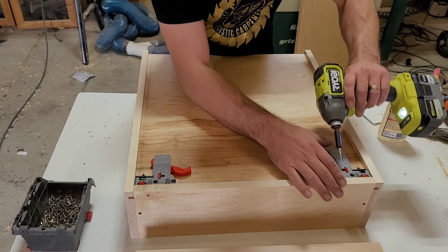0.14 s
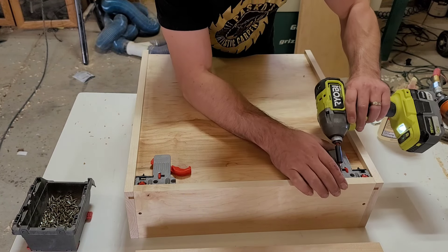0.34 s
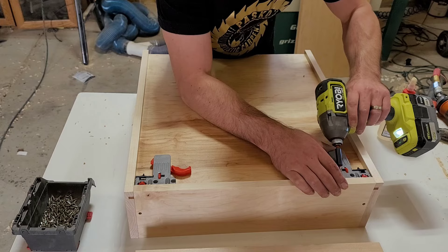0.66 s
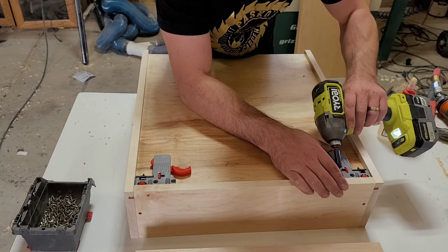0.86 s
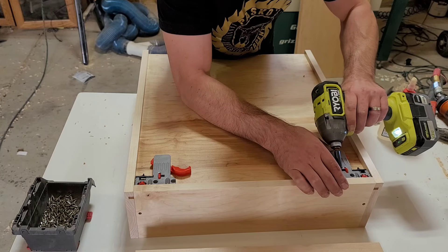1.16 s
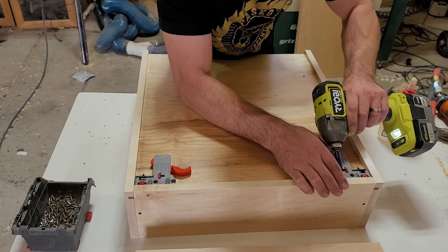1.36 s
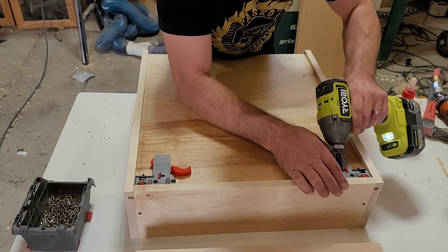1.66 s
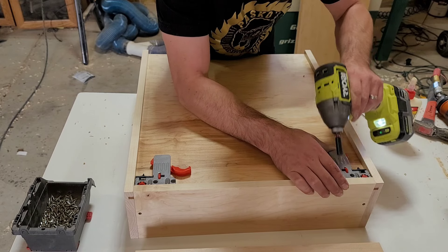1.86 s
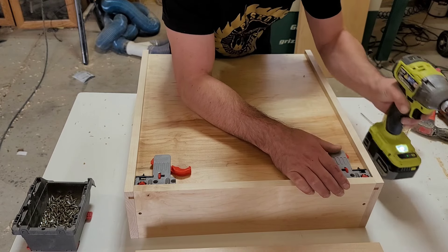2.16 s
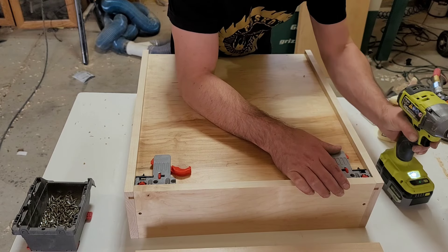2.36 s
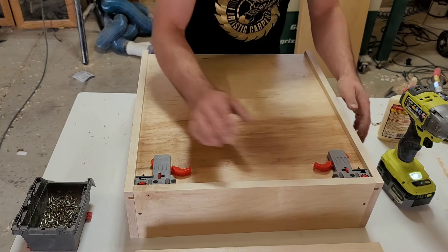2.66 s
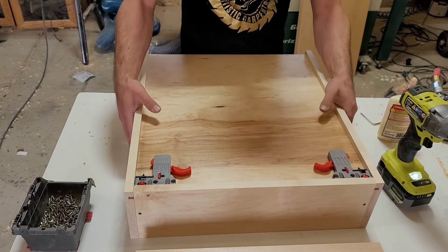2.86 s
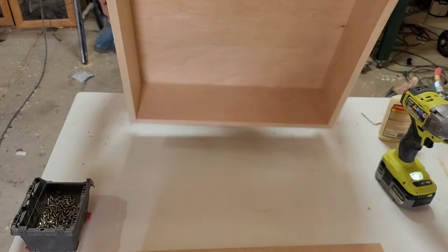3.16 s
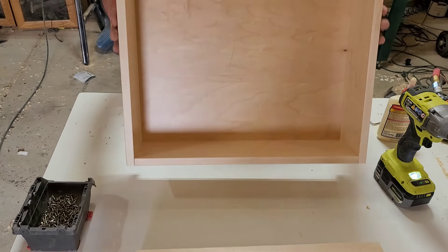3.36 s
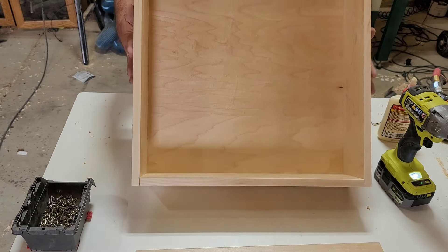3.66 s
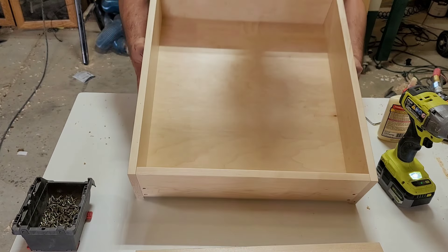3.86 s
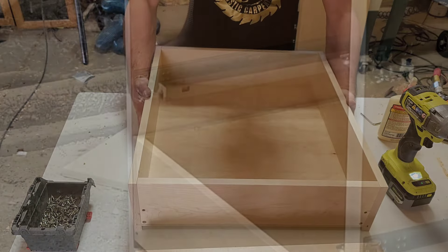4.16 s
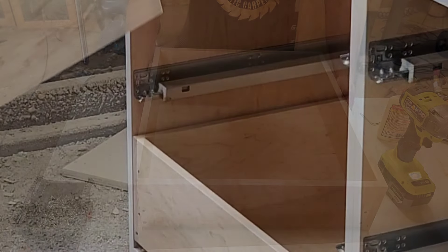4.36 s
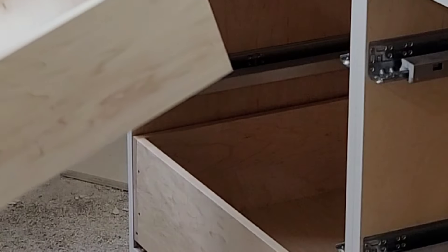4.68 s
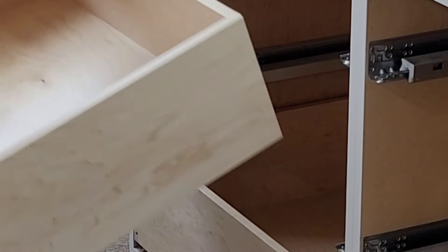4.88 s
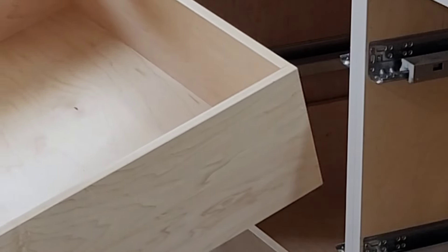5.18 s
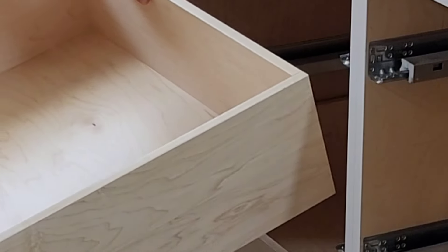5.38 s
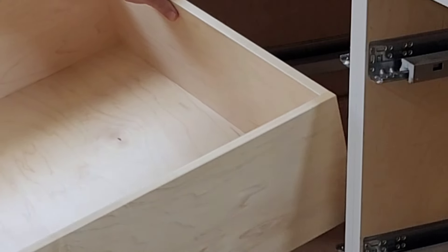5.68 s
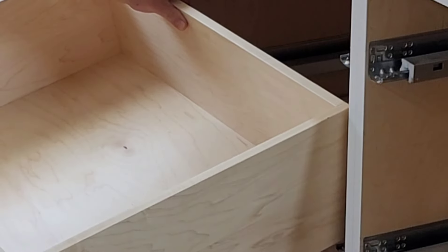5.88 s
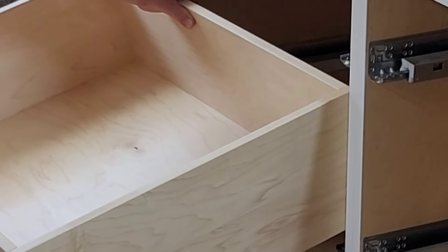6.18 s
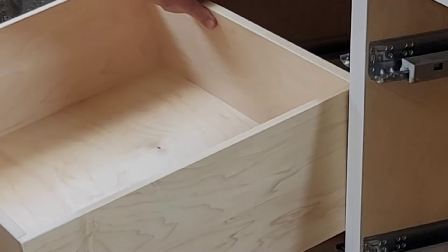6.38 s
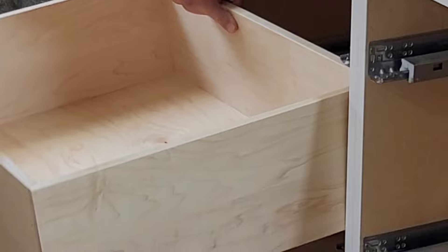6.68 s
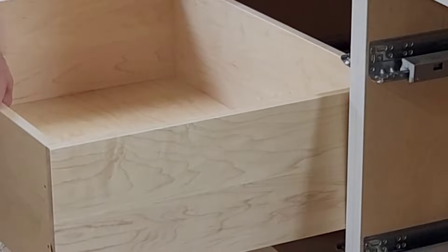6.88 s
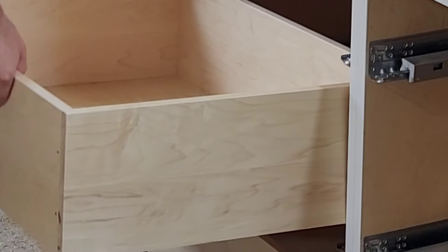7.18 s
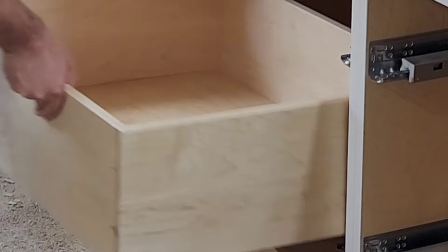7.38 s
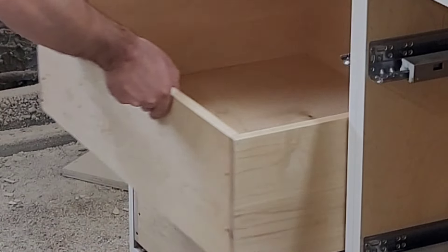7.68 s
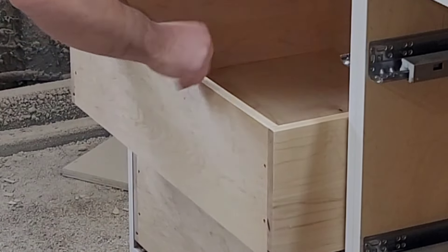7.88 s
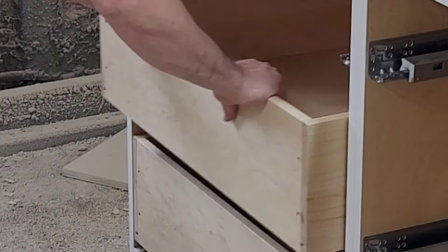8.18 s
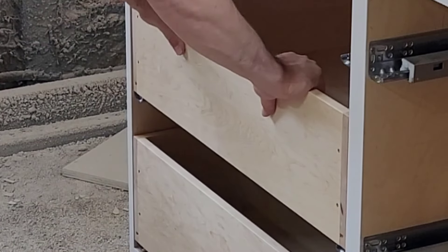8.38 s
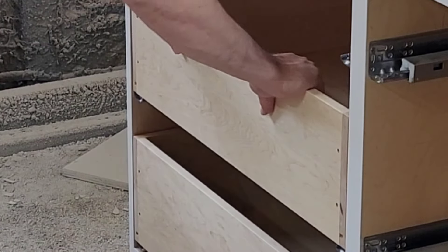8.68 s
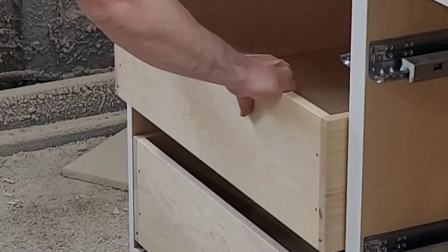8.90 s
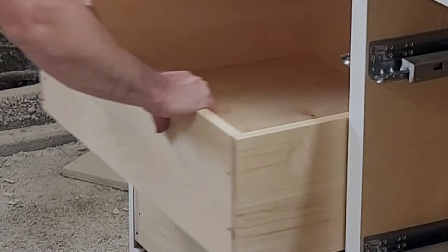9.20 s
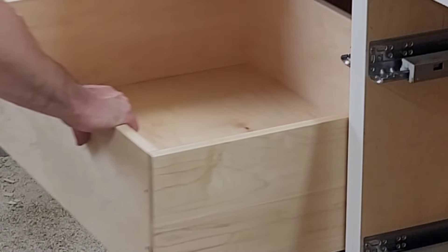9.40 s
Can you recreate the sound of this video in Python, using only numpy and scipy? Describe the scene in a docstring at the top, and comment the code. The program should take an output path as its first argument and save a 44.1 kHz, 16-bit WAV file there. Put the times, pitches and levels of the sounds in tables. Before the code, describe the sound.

In a quiet workshop with faint hum, small clicks lead to a short cordless driver burst, whining up then slowing as the screw bites. The tool is set down, and a plywood drawer thumps onto the bench and drags. It then bumps hollowly against its cabinet, rumbles along runners, snaps loudly into steel catches, and is drawn out. Close stereo pickup, small room.

```python
"""A cordless driver turns a screw into a plywood drawer: harmonics of its speed over gear noise and rattle.
It is set down on the bench; then the drawer is turned over, bumped into its cabinet, pushed along
steel runners until the catches snap, and drawn out again. Blows excite decaying modes and dense noise
fields; rubbing is shaped noise, partly passed through modes; still air and a faint hum lie beneath."""
import sys
import numpy as np
from scipy import signal
from scipy.fft import rfft, irfft, next_fast_len
from scipy.io import wavfile
from scipy.ndimage import uniform_filter1d

SR = 44100
rng = np.random.default_rng(int(sys.argv[2]) if len(sys.argv) > 2 else 0)


def store_pcm(level_fs):
    """Save levels as 16-bit WAV."""
    pcm = np.round(np.clip(level_fs, -1, 1) * 32767).astype(np.int16)
    wavfile.write(sys.argv[1], SR, np.atleast_2d(pcm).T)


N = 421036
# All levels are relative: trims, normalisation and the output stage still act on them.


def from_db(db):
    """Amplitude ratio: 20 dB is a factor of ten."""
    return 10 ** (np.asarray(db) / 20)


def rms_one(x):
    """Normalisation by effective value: unit rms."""
    return x / np.sqrt(np.mean(x ** 2) + 1e-20)


def onset_one(x):
    """Normalisation by early energy: unit rms over the first 25 ms."""
    return x / np.sqrt(np.mean(x[..., :SR // 40] ** 2) + 1e-20)


def level_curve(rows):
    """Envelope: gain interpolated linearly in dB, fading to silence within 10 ms outside its span."""
    s, level_db = np.transpose(rows)
    t = np.arange(N) / SR
    inside = np.clip(np.minimum(t - s[0], s[-1] - t) / .01 + 1, 0, 1)
    return inside * from_db(np.interp(t, s, level_db))


def strokes(rows, attack_s, release_s):
    """Stroke envelope: each sets in, swells or wanes while it lasts, and decays exponentially."""
    t, gain = np.arange(0, N, 40) / SR, 0
    for start, length, db, swell_db in rows:
        progress = np.clip((t - start) / length, 0, 1)
        over = np.maximum(t - start - length, 0)
        attack = np.clip((t - start) / attack_s, 0, 1)
        fade = from_db(-60 * over / release_s)
        gain = gain + attack * from_db(db + swell_db * (progress - .5)) * fade
    return np.interp(np.arange(N) / SR, t, gain)


def at_hz(points, hz):
    """Interpolation on a logarithmic frequency axis."""
    return np.interp(np.log(hz + 1e-9), np.log(np.array(points)[:, 0]), np.array(points)[:, 1])


def drift(rate_hz):
    """Random modulation: two-pole low-passed noise of unit rms, computed at every 40th sample."""
    pole = np.exp(-80 * np.pi * rate_hz / SR)
    white = rng.standard_normal(N // 40 + 2002)
    slow = signal.lfilter([1], [1, -2 * pole, pole * pole], white)[2000:]
    return np.interp(np.arange(N) / 40, np.arange(len(slow)), rms_one(slow))


def band(x, low, high):
    """Causal band-pass filtering between two corner frequencies in Hz."""
    sos = signal.butter(3, [low, min(high, .45 * SR)], "band", fs=SR, output="sos")
    return signal.sosfilt(sos, x)


# stereo width: f/Hz, side over mid level/dB
STEREO_WIDTH = [(60, -13.5), (125, -18.5), (250, -12), (500, -4.5), (1000, 0), (2000, 0), (12000, -1)]


def noise(spectrum, size=N, grain_db=0):
    """Spectral shaping of mid-side noise, wider towards the treble; grain_db makes contacts uneven."""
    length = next_fast_len(size, True)
    hz = np.arange(length // 2 + 1) * SR / length
    sizes = from_db(grain_db * np.minimum(rng.exponential(1, length), 7))
    contacts = rng.standard_normal((2, length)) * sizes
    mid, side = rfft(contacts) * from_db(at_hz(spectrum, hz))
    side = side * from_db(at_hz(STEREO_WIDTH, hz))
    return rms_one(irfft(np.array([mid + side, mid - side]), length)[:, :size])


def ringing(modes, low=0, high=SR):
    """Modal superposition: one second of decaying sines whose frequencies lie in a range."""
    t = np.arange(SR) / SR
    out = np.zeros(SR)
    for k, (hz, db, t60) in enumerate(modes):
        if low <= hz < high:
            out += (-1) ** k * from_db(db - 60 * t / t60) * np.sin(2 * np.pi * hz * t)
    return out


def excited(force, modes):
    """Linear response: the force convolved with the impulse response of a body."""
    return rms_one(signal.oaconvolve(force, modes[None], axes=1)[:, :N])


# reverberation: f/Hz, t60/s
ROOM_DECAY = [(80, 0.14), (300, 0.58), (1000, 0.38), (4000, 0.21), (12000, 0.73)]


def response(spectrum, low, high, t60, room_db):
    """High modal density: a noise field that dies quickly, while the room holds it a while longer."""
    t = np.arange(SR) / SR
    room_t60 = at_hz(ROOM_DECAY, np.sqrt(low * high))
    fade = np.hypot(from_db(-60 * t / t60), from_db(room_db - 60 * t / room_t60))
    field = band(noise(spectrum, size=2 * SR), low, high)[:, SR:]
    local_rms = np.sqrt(uniform_filter1d(np.mean(field ** 2, axis=0), SR // 25))
    return onset_one(band(field / local_rms * fade, low / 1.3, high * 1.3))


def strike(times, levels_db, body, chatter_s=0):
    """Impulsive excitation: each blow sets the body going; a loose contact chatters on for a moment."""
    force, t = np.zeros(N + SR), np.arange(SR // 10) / SR
    for s, db in zip(times, levels_db):
        contacts = rng.random(len(t)) < 900 / SR  # 900 per second on average
        touch = rng.standard_normal(len(t)) * contacts * np.exp(-t / (chatter_s + 1e-9))
        touch[0] = 2
        force[int(s * SR):][:len(t)] += from_db(db) * touch / np.linalg.norm(touch)
    return signal.oaconvolve(force[None, :N], np.atleast_2d(body), axes=1)[:, :N]


def in_room(x, wet_db):
    """Direct and diffuse field: direct sound a touch earlier on the right, plus decaying reflections."""
    t = np.arange(SR // 2) / SR
    echo = rng.standard_normal((2, len(t))) * from_db(-60 * t / 0.16)
    echo *= from_db(wet_db) / np.linalg.norm(echo[0])
    echo[0, 5] += 1  # left: five samples late
    echo[1, 0] += 1
    return signal.oaconvolve(x[None], echo, axes=1)[:, :N]


# colour of the air: f/Hz, level/dB
AIR_COLOUR = [(25, -13.5), (55, -0.5), (130, -9), (450, -11), (1100, -24), (2000, -29), (4000, -41),
              (10000, -50.5), (16000, -58)]
# room tone: t/s, level/dB
AIR_LEVELS = [(0, -49.5), (4.1, -49.5), (4.6, -52.5), (9.55, -55.5)]


def room_tone(hum_hz=119.5, hum_db=-5.5):
    """Stationary noise: still workshop air with a steady, faint mains hum."""
    hum = from_db(hum_db) * np.sin(2 * np.pi * hum_hz * np.arange(N) / SR)
    return level_curve(AIR_LEVELS) * (noise(AIR_COLOUR) + hum)


# small hard clicks of bit, screw and trigger: t/s, click level/dB, bright edge level/dB, ring f/Hz
SMALL_CLICKS = [(0.018, -47, -84, 1900), (0.546, -51, -80, 2000), (0.8047, -41.5, -65, 3330),
                (0.919, -36.5, -65, 2400), (1.04, -41, -52, 2336), (1.4065, -40, -18, 5500),
                (1.8249, -30.5, -49, 4920), (1.8291, -26, -33, 2310), (2.2035, -44, -49.5, 4300),
                (3.288, -45, -70, 3900)]
# colour of hard contacts: f/Hz, level/dB
STEEL_COLOUR = [(500, 0), (1500, -1), (3000, 2), (4300, -5), (5700, -0.5), (6500, -11), (7400, -18.5),
                (10000, -22.5), (13500, -20), (16000, -23.5)]


def clicks(click_db=-9.0, body_db=-15.0, ring_db=-13, ring_t60_s=.17):
    """Short contact, broad spectrum: small parts tick, tap the panel and ring, each at its own pitch."""
    s, click, edge, pitch = np.transpose(SMALL_CLICKS)
    tick = response(STEEL_COLOUR, 1300, 5500, t60=0.034, room_db=-15.5)
    panel = response(STEEL_COLOUR, 270, 1300, t60=0.05, room_db=-17.5)
    out = strike(s, click, from_db(click_db) * tick + from_db(body_db) * panel, chatter_s=0.0024)
    for start, db, hz in zip(s, click, pitch):
        out = out + strike([start], [db], ringing([(hz, ring_db, ring_t60_s)]))
    bright = response(STEEL_COLOUR, 7200, 16000, t60=.012, room_db=-36.5)
    return out + strike(s, edge, bright)


# hands and sleeves brushing past: start t/s, length t/s, level/dB, swell/dB
SLEEVE_BRUSHES = [(0.07, 0.062, -74, -2), (0.225, 0.04, -77, -4), (2.46, 0.063, -59.5, -22),
                  (2.86, 0.086, -66, -16), (3.17, 0.2, -64.5, -11), (4.38, 0.36, -65, 0)]
# plywood dragged over the bench: start t/s, length t/s, level/dB, swell/dB
PLYWOOD_DRAGS = [(3.6, 0.29, -34, -9), (3.88, 0.36, -50.5, 14.5)]
# colour of rubbing: f/Hz, level/dB
RUB_COLOUR = [(120, 2.5), (450, -2.5), (800, -11), (1300, -11.5), (2300, -27), (5800, -31.5), (7500, -39),
              (15000, -46.5)]
# ringing of the drawer, also under driver, blows and runners: f/Hz, level/dB, t60/s
DRAWER_RING = [(73.4, 7.5, 0.39), (96.45, 7.5, 0.46), (189.7, 5, 0.36), (253.3, 9.5, 0.12),
               (334.3, 1, 0.25), (390, -6.5, .2), (500.6, 5, 0.2), (572, -1.5, 0.58), (747, -3, 0.29),
               (1055, -9, 0.087), (1258, -3.5, 0.15), (1387, -5, 0.13), (1588, -4.5, 0.092)]


def handling(rub_db=0.0, boom_db=-3.5, hiss_db=9.5, wood_hiss_db=-23.0):
    """Friction noise: skin and plywood edges drag as the drawer is handled, and its box resonates."""
    envelope = dict(attack_s=0.065, release_s=0.8)
    rub = strokes(PLYWOOD_DRAGS, **envelope)
    hiss = np.hypot(strokes(SLEEVE_BRUSHES, **envelope), from_db(wood_hiss_db) * rub)
    friction = noise(RUB_COLOUR, grain_db=3.0) * from_db(1.8 * drift(22))
    wood = from_db(rub_db) * rms_one(band(friction, 78, 1340))
    wood += from_db(boom_db) * excited(band(friction, 230, 1800), ringing(DRAWER_RING))
    return rub * wood + from_db(hiss_db) * hiss * rms_one(band(friction, 2280, 18000))


# modes of the driver's housing: f/Hz, level/dB
HOUSING_RING = [(1680, -2.2), (2390, 0.14), (3090, 1), (4020, -0.38), (4410, -2.6), (5490, 0.9)]


def rattle(rattles_per_s=190, t60_s=.018):
    """Random impacts: loose gears and bit knock, each knock ringing the housing with its own mix."""
    knocks = rng.random(N) < rattles_per_s / SR
    out = np.zeros(N)
    for hz, db in HOUSING_RING:
        force = knocks * rng.standard_normal(N)
        out += signal.oaconvolve(force, ringing([(hz, db, t60_s)]))[:N]
    return rms_one(out)


# whine as the housing colours each multiple of the speed: f/Hz, level/dB
WHINE_COLOUR = [(300, -16), (550, -22), (800, -16), (1200, -12.5), (1650, -7), (2300, -13), (3200, -8),
                (4300, -8.5), (5400, -7.5), (6800, -26)]


def motor_orders(speed, turn, on, flutter_db=3.4, backlash_rad=.42):
    """Harmonic series of rotation: 21 multiples of the speed, their level and phase wavering."""
    orders = np.zeros(N)
    for k in range(1, 22):
        level_db = at_hz(WHINE_COLOUR, k * speed[on]) + flutter_db * drift(35)[on]
        backlash = backlash_rad * drift(70)[on]
        orders[on] += from_db(level_db) * np.sin(k * turn[on] + backlash + rng.uniform(0, 2 * np.pi))
    return orders


# trigger held: start t/s, length t/s, whistle level/dB, swell/dB
TRIGGER_HOLDS = [(1.03, .69, -56, -3)]


def whistle(speed, centre_hz=10000, part_turns_per_s=200, spread_turns_per_s=15, part_db=12):
    """Frequency modulation: the speed control's unsteady whistle, strongest at part speed."""
    tone = np.sin(2 * np.pi * np.cumsum(centre_hz + 70 * drift(150)) / SR)
    part_speed = np.exp(-((speed - part_turns_per_s) / spread_turns_per_s) ** 2)
    held = strokes(TRIGGER_HOLDS, attack_s=0.028, release_s=0.2)
    return in_room(held * from_db(part_db * part_speed) * tone, wet_db=-13.0)


# motor running up, then slowing by fits as the screw bites: t/s, speed/(turns per s)
MOTOR_SPEED = [(1.03, 150), (1.07, 300), (1.16, 415), (1.235, 450), (1.26, 494), (1.285, 505), (1.33, 475),
               (1.38, 440), (1.42, 430), (1.46, 402), (1.49, 371), (1.545, 334), (1.60, 298), (1.64, 280),
               (1.69, 210), (1.80, 60)]
# effort of the driver, as gear noise: t/s, level/dB
DRIVER_EFFORT = [(1.035, -51), (1.06, -35), (1.17, -29), (1.22, -26), (1.45, -23), (1.665, -27.5),
                 (1.69, -32.5), (1.755, -35), (1.79, -50)]
# colour of the gears: f/Hz, level/dB
GEAR_COLOUR = [(130, -24.5), (340, -13), (620, -16), (1400, -11.5), (2400, -11), (3500, -7), (5800, -11),
               (7200, -21.5), (14400, -26), (16000, -44)]
# bit rasping in the screw head, once per turn: start t/s, length t/s, level/dB, swell/dB
BIT_RASPS = [(1.208, .035, -34, 0), (1.335, .035, -34, 0), (1.472, .032, -29, 4)]
# screw groaning in the panel: start t/s, length t/s, level/dB, swell/dB
SCREW_GROANS = [(1.2, 0.036, -35.5, 3.5), (1.28, 0.14, -44.5, 1.5), (1.44, 0.23, -35.5, 4.5)]


def driver(grit_db=-5.5, fizz_db=-7.5, rattle_db=-5.5, throb=0.24):
    """Rotational noise: orders glide over gear grit and rattle; the bit rasps and the screw groans."""
    gear = level_curve(DRIVER_EFFORT) * from_db(1.1 * drift(20))
    t = np.arange(N) / SR
    speed = np.interp(t, *np.transpose(MOTOR_SPEED)) * (1 + .004 * drift(45))
    turn = 2 * np.pi * np.cumsum(speed) / SR
    # the gears sing once the screw bites
    bite = np.interp(t, [1.17, 1.26, 1.62, 1.70], [.35, 1, 1, 0])
    tones = bite * motor_orders(speed, turn, gear > 0) + from_db(rattle_db) * rattle()
    out = in_room(gear * tones, wet_db=-5.0)

    grit = noise(GEAR_COLOUR, grain_db=2.6) * (1 + throb * np.cos(turn)) * from_db(1.9 * drift(90))
    out += from_db(grit_db) * gear * rms_one(band(grit, 460, 7200))
    # the gears fizz fully above 300 turns per second
    fizz = gear * np.minimum(speed / 300, 1) ** 2.4
    out += from_db(fizz_db + 1.5 * drift(50)) * fizz * rms_one(band(grit, 7400, 17000))

    rasp = rms_one(np.exp(2.5 * np.cos(turn)) * band(grit, 3600, 7000))
    out += strokes(BIT_RASPS, attack_s=.008, release_s=.08) * rasp
    groan = excited(band(grit, 150, 520), ringing(DRAWER_RING))
    out += strokes(SCREW_GROANS, attack_s=0.017, release_s=0.28) * groan
    return out + whistle(speed)


def drawer_blows(rows, wood, shares, trims_db, t60s, modes_db, room_db, chatter_s):
    """Impact spectrum: modes plus a wooden clack in four registers; harder blows reach higher."""
    # every blow rebounds once after 36 ms, weaker and softer
    rebounds = np.array(rows) + [.036, -12.5, -15]
    s, weight, hardness = np.vstack([rows, rebounds]).T
    edges_hz = [35, 130, 400, 1500, 16000]
    out = 0
    for k, share in enumerate(shares):
        low, high = edges_hz[k:k + 2]
        modes = onset_one(band(ringing(DRAWER_RING, low, high), low / 2, high * 2))
        body = response(wood, low, high, t60s[k], room_db) + from_db(modes_db[k]) * modes
        level_db = weight + share * hardness + trims_db[k]
        out = out + strike(s, level_db, onset_one(body), chatter_s * (k >= 2))
    return out


# driver, hands and drawer landing on the bench: t/s, weight level/dB, hardness/dB
BENCH_LANDINGS = [(2.335, -28, 9), (2.818, -33.5, -14.5), (3.494, -9, -12.5), (3.523, -13, -0.5),
                  (3.534, -18.5, -0.5), (4.178, -24, 10.5)]
# colour of the bench: f/Hz, level/dB
BENCH_COLOUR = [(35, -27), (75, 13), (120, 6.5), (260, -12.5), (400, -13.5), (550, -12.5), (750, -23),
                (1400, -27), (2200, -25), (5300, -29.5), (7500, -41.5), (16000, -56)]
# share of a blow's hardness that reaches its thump, boom, knock and crack
BENCH_SHARES = [0.001, .1, .5, 1.05]


def bench_blows():
    """Impact on a damped plate: things land on the bench with little chatter."""
    return drawer_blows(
        BENCH_LANDINGS, BENCH_COLOUR, BENCH_SHARES,
        trims_db=[-1.0, -0.5, -2.5, -11.0], t60s=[0.11, 0.35, 0.19, 0.065],
        modes_db=[1.0, 0.5, -23.0, -28.0], room_db=-10.5, chatter_s=0.0027)


# ringing of the plywood panels: f/Hz, level/dB
PANEL_RING = [(195, 6.5), (355, 3.5), (436, -2), (603, -1.5), (743, -2), (860, -4), (1100, -4.5), (1345, 2),
              (1450, -10)]


def panel_ring(t60_s=0.18):
    """Modal participation: the panels' modes, a little differently mixed each time."""
    return onset_one(ringing([(hz, db + rng.normal(0, 1.7), t60_s) for hz, db in PANEL_RING]))


# knocks and rattles on wood, the first as the driver is set down on the bench: t/s, level/dB, f/Hz that the
# contact favours
WOOD_KNOCKS = [(2.336, -30.5, 172), (2.82, -43, 638), (2.872, -49.5, 645), (4.185, -15, 390),
               (4.1865, -19.5, 1140), (4.493, -40.5, 377), (5.268, -43.5, 1100), (5.675, -23.5, 177),
               (6.214, -30, 210), (6.478, -22, 530), (7.231, -36, 760), (7.278, -37.5, 950),
               (7.425, -16, 337), (7.515, -6.5, 202), (7.9, -42, 320)]


def edge_knocks(clack_db=2.5):
    """Selective excitation: each knock wakes a panel's modes around the pitch its contact favours."""
    out = np.zeros((2, N + SR))
    clack = response(STEEL_COLOUR, 150, 3300, t60=0.11, room_db=-12.0)
    for s, db, hz in WOOD_KNOCKS:
        body = band(panel_ring() + from_db(clack_db) * clack, hz / 1.5, hz * 1.5)
        out[:, int(s * SR):][:, :SR] += from_db(db) * onset_one(body)
    return out[:, :N]


# side panel scraping past the cabinet frame: start t/s, length t/s, level/dB, swell/dB
PANEL_SCRAPES = [(4.56, 0.04, -52.5, 6), (4.75, 0.088, -48, -7), (5.115, 0.037, -53.5, -1),
                 (5.255, 0.023, -44.5, -1), (6.895, 0.016, -43, 4), (7.15, 0.04, -42, -1),
                 (7.225, 0.067, -40, 13)]


def scrapes():
    """Stick-slip friction: uneven slips of a panel along the frame ring its own modes."""
    slips = rms_one(band(noise(RUB_COLOUR, grain_db=4.5), 750, 6500)) * from_db(2.5 * drift(60))
    wood = excited(slips, panel_ring())
    return strokes(PANEL_SCRAPES, attack_s=0.0066, release_s=0.37) * rms_one(wood + slips)


# drawer bumping on cabinet and runners: t/s, weight level/dB, hardness/dB
CABINET_BUMPS = [(5.654, -20.5, -17), (5.672, -16.5, -24.5), (5.715, -20, -32), (5.812, -30.5, -34.5),
                 (6.024, -19.5, -29), (6.212, -23.5, -26), (6.245, -23.5, -36), (6.473, -19, -13.5),
                 (6.49, -14, -21.5), (7.407, -19, -1.5), (7.428, -14.5, -0.5), (7.445, -11, 0),
                 (7.49, -11, -3.5), (7.515, -15, -5), (8.29, -34, 18.5), (8.322, -12.5, -10.5)]
# colour of the cabinet: f/Hz, level/dB
CABINET_COLOUR = [(35, -19), (80, 2), (170, 4.5), (260, 3), (400, -7.5), (600, -10.5), (800, -20),
                  (1600, -21), (3000, -24.5), (4300, -29.5), (5600, -25.5), (6400, -35), (7300, -47),
                  (15500, -53.5)]
# share of a blow's hardness that reaches its thump, boom, knock and crack
CABINET_SHARES = [0.001, .35, .95, 1.05]


def cabinet_blows():
    """Impact on a resonant box: the drawer bumps the cabinet, with a longer thump and more chatter."""
    return drawer_blows(
        CABINET_BUMPS, CABINET_COLOUR, CABINET_SHARES,
        trims_db=[0.5, 0.5, 1.5, -4.0], t60s=[0.57, 0.14, 0.33, 0.23],
        modes_db=[4.5, -2.5, -10.0, -9.5], room_db=-6.5, chatter_s=0.015)


# ringing of the steel runners: f/Hz, level/dB
RUNNER_RING = [(1866, 3), (2478, -11), (2834, 5.5), (3518, -3.5), (5335, 6.5)]


def runner_ring():
    """Boundary damping: the runners are screwed to wood, so their ring is short."""
    return onset_one(ringing([(hz, db, .19) for hz, db in RUNNER_RING]))


# stages of pushing in, then drawing out: start t/s, length t/s, level/dB, swell/dB,
# weight on the bottom level/dB, contact with the steel level/dB
DRAWER_PUSHES = [(5.76, 0.23, -74, 13.5, 9, 6), (6.128, 0.38, -64, 16.5, 19.5, -10),
                 (6.66, 0.39, -58, -3.5, 14, -10.5), (7.088, 0.18, -56, 3, 14, -5.5),
                 (7.302, 0.52, -49.5, -8.5, 7.5, 3), (8.043, 0.16, -53.5, 11.5, 13.5, 2.5),
                 (8.812, 0.27, -64, 11.5, 12.5, -6.5), (9.122, 0.25, -59, 3.5, 23, -18.5),
                 (9.339, 0.18, -48, 18.5, 2.5, -14)]
# colour of the runners: f/Hz, level/dB
RUNNER_COLOUR = [(35, -16.5), (85, 5), (180, -8.5), (400, -10.5), (1400, -20.5), (2400, -26), (3600, -28),
                 (4600, -28.5), (5700, -28.5), (6500, -36), (7400, -44.5), (15500, -54)]
# faint squeak of a runner under the drawer's edge: start t/s, length t/s, level/dB, swell/dB
RUNNER_SQUEAKS = [(5.76, 0.26, -66.5, 7.5)]


def travel(rumble_db=3.0, rub_db=7.5, runner_db=6.5, ring_db=-5.5, scrape_db=-1.5):
    """Rolling excitation: rollers rumble through the drawer bottom and make the steel runners sing."""
    envelope = dict(attack_s=.03, release_s=.33)
    start, length, db, swell, weight, contact = np.transpose(DRAWER_PUSHES)
    rumble = strokes(zip(start, length, db + weight, swell), **envelope)
    rub = strokes(zip(start, length, db, swell), **envelope)
    runner = strokes(zip(start, length, db + contact, swell), **envelope)
    rolling = noise(RUNNER_COLOUR, grain_db=1.8) * from_db(1.6 * drift(36))
    out = from_db(rumble_db) * rumble * rms_one(band(rolling, 39, 290))
    out += from_db(rub_db) * rub * rms_one(band(rolling, 250, 1700))
    # a plywood side scraping past the frame
    scrape = excited(band(rolling, 570, 2600), ringing(DRAWER_RING))
    out += from_db(scrape_db + 2.0 * drift(35)) * rub * scrape
    squeak = from_db(3 * drift(30)) * rms_one(band(rolling, 4900, 5700))
    out += strokes(RUNNER_SQUEAKS, **envelope) * squeak
    steel = excited(band(rolling, 1700, 7500), runner_ring())
    hiss = rms_one(band(rolling, 2400, 15000))
    return out + from_db(runner_db) * runner * (hiss + from_db(ring_db) * steel)


# steel catches riding up and snapping in: t/s, clash level/dB, bright edge level/dB
CATCH_SNAPS = [(8.2283, -13, -30), (8.238, -14, -27), (8.2628, -3.5, -22.5), (8.275, -24.5, -15),
               (8.2878, -7, -19.5), (8.316, -7, -20.5), (8.3529, -13.5, -41)]
# drawer meeting its end stop: t/s, level/dB
END_STOP = [(8.329, -17)]
# sway of the cabinet: f/Hz, level/dB, t60/s
CABINET_SWAY = [(41.3, -8.5, 1), (51.9, 2, 0.71), (148.6, -1, 0.41)]


def catches(clash_db=-5.5, edge_db=-5.5, ring_db=-17.5, shake_db=-20.5):
    """Structure-borne impact: catches rattle home and shake the drawer; the cabinet takes its weight."""
    s, clash, edge = np.transpose(CATCH_SNAPS)
    steel = response(STEEL_COLOUR, 550, 7300, t60=0.16, room_db=-9.5)
    steel = steel + from_db(ring_db) * runner_ring()
    bright = response(STEEL_COLOUR, 7300, 15000, t60=0.16, room_db=-39.0)
    out = strike(s, clash + clash_db, steel, chatter_s=0.02)
    out += strike(s, edge + edge_db, bright, chatter_s=0.013)
    out += strike(s, clash + shake_db, onset_one(ringing(DRAWER_RING)))
    return out + strike(*np.transpose(END_STOP), ringing(CABINET_SWAY))


# latch letting go: start t/s, length t/s, level/dB, swell/dB
LATCH_RELEASE = [(9.367, 0.018, -41.5, 0.5)]
# colour of the latch: f/Hz, level/dB
LATCH_COLOUR = [(4100, -13.5), (4700, 3), (5150, -5), (5700, 0.5), (6700, -17), (15000, -35)]


def latch():
    """Dry friction: the small steel latch grates free with a short, gritty click."""
    grating = noise(LATCH_COLOUR, grain_db=5) * from_db(3 * drift(150))
    return strokes(LATCH_RELEASE, attack_s=.006, release_s=.13) * grating


def scene():
    """Superposition: bench work with driver and clicks a little to the right, then the cabinet."""
    tool = (driver() + clicks()) * from_db([[-1], [1]])  # left, right
    wood = bench_blows() + edge_knocks() + scrapes() + cabinet_blows()
    return room_tone() + tool + handling() + wood + travel() + catches() + latch()


def record(dry):
    """Soft saturation and low-pass filtering: the highest peaks are rounded and the top is cut."""
    rounded = 1.117 * np.tanh(dry / 1.505)
    return signal.sosfilt(signal.ellip(10, .1, 80, 16100, fs=SR, output="sos"), rounded)


dry = scene()
out = record(dry)
store_pcm(out)
```